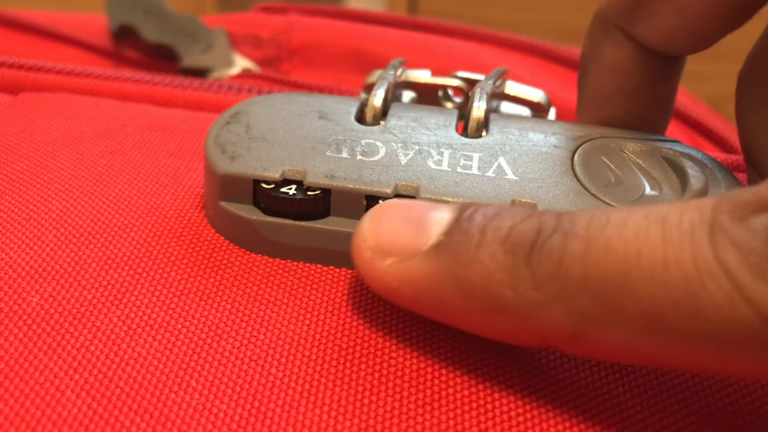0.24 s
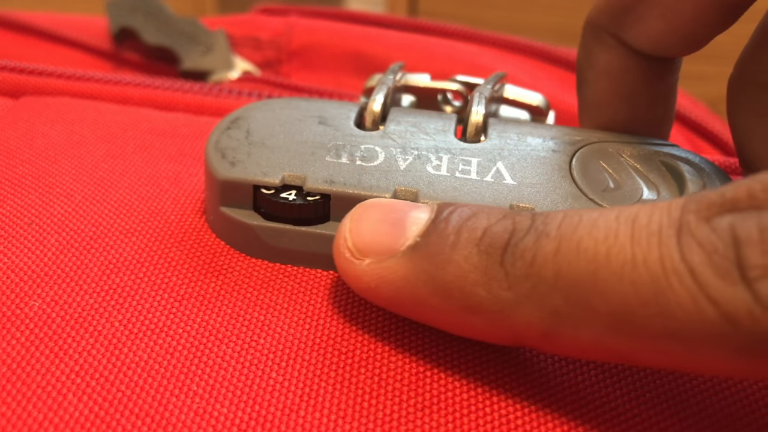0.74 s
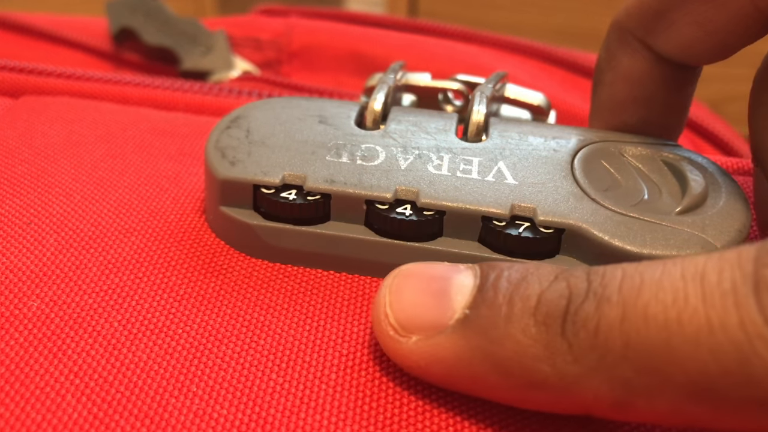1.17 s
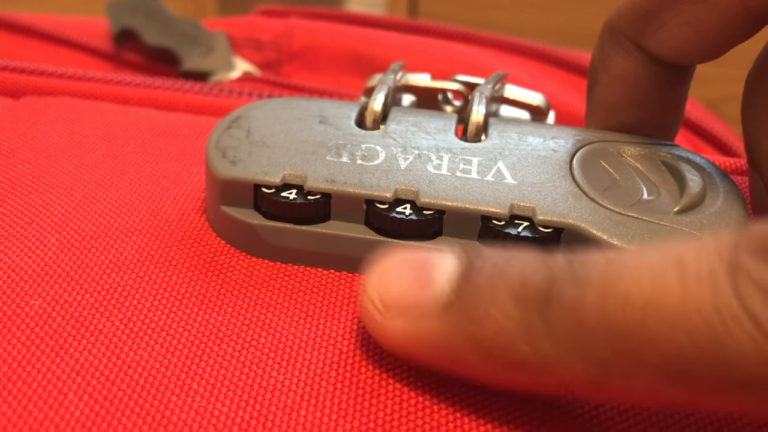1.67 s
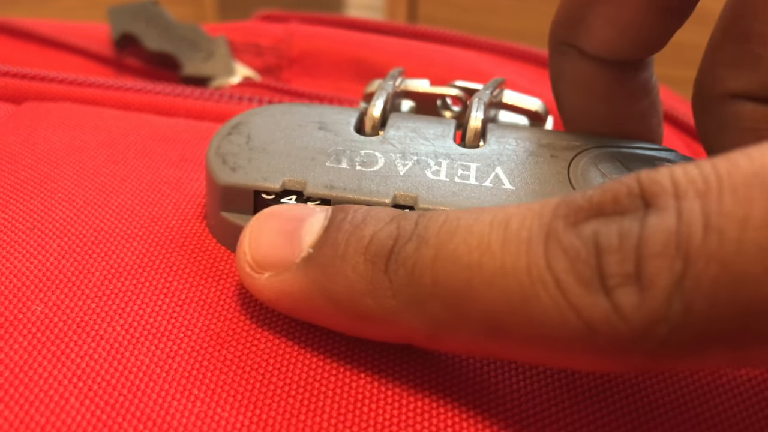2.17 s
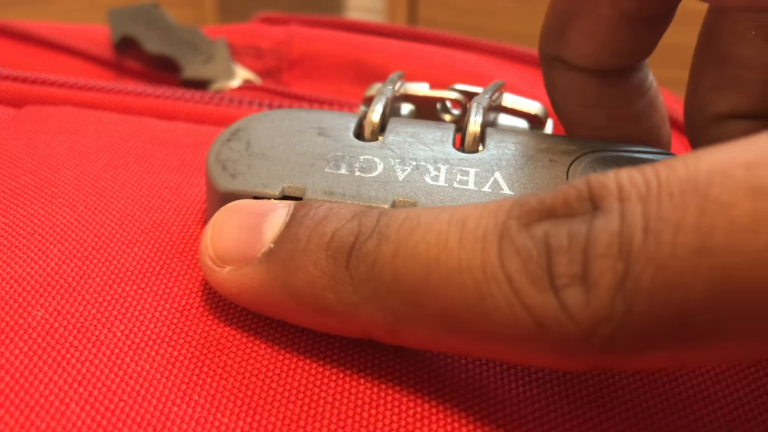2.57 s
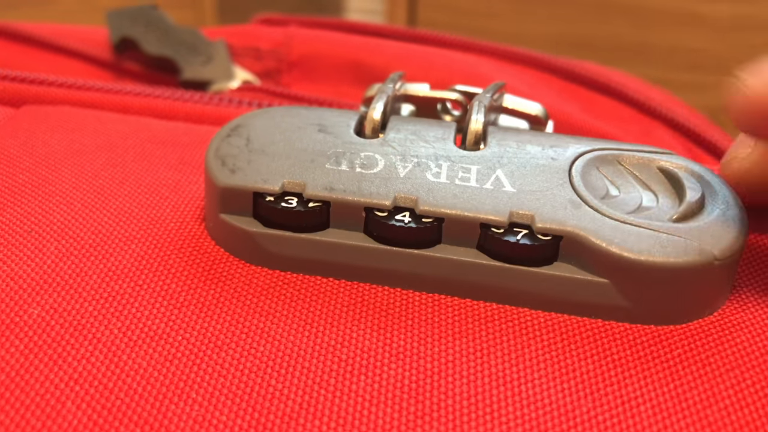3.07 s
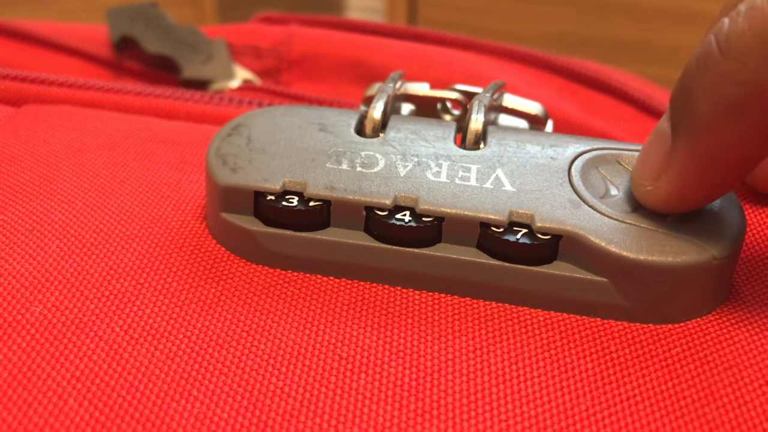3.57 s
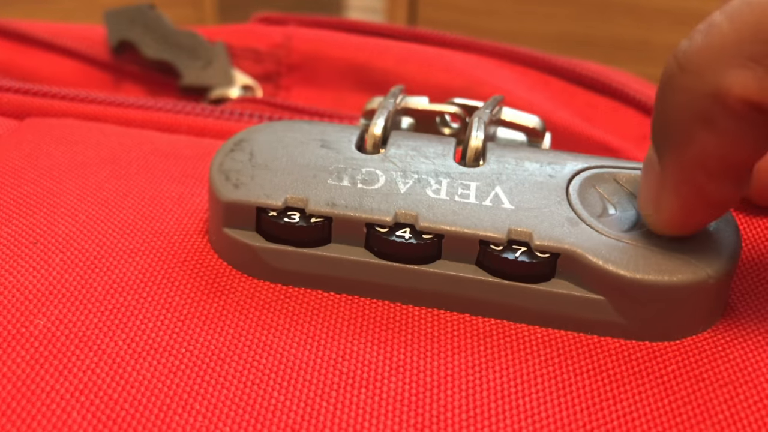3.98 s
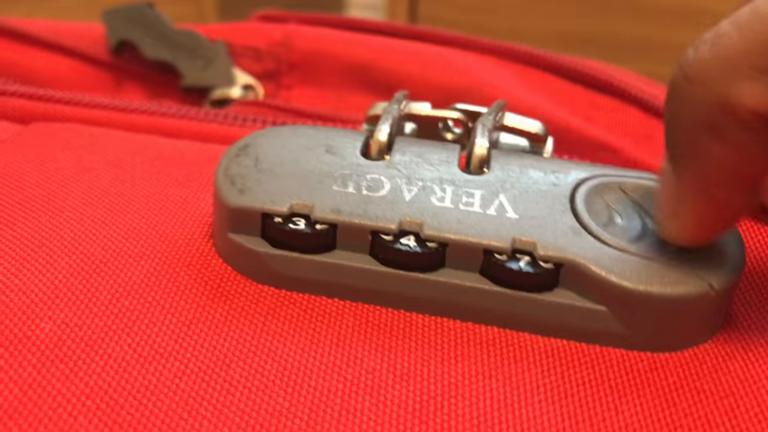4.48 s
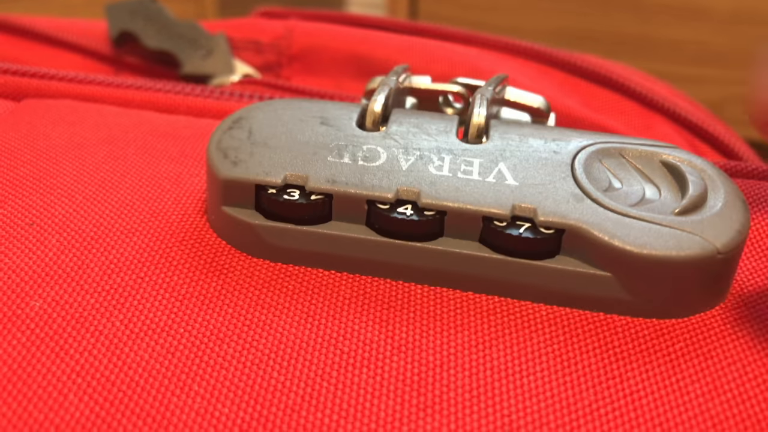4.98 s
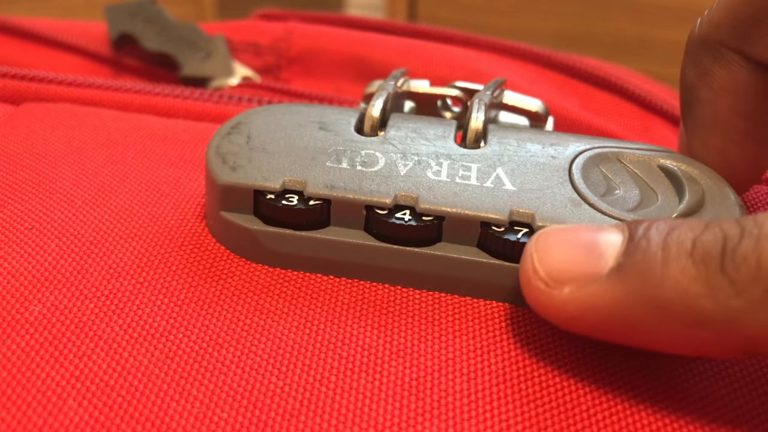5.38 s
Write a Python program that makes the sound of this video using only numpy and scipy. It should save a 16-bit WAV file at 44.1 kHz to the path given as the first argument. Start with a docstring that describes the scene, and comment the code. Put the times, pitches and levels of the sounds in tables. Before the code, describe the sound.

Close, dry plastic clicks and soft skin scuffs on a suitcase lock, building through gritty button creaks to one sharp, thudding snap.

```python
"""A plastic lock on a fabric suitcase clicks close to the microphone: its number wheels tick under a finger,
its button creaks in short slips, and the latch lets go with one loud snap that thuds through the case.
Gritty bursts of force ring the lock, and a smooth push rings the case; a noisy tail follows.
Skin rubs and some wheel clicks hiss as shaped, uneven noise; finger pushes and the snap swing the case low.
A quiet room lies underneath: coloured noise and a wavering hum."""
import sys
import numpy as np
from scipy import signal
from scipy.fft import rfft, irfft
from scipy.io import wavfile
from scipy.ndimage import uniform_filter1d

SR = 44100
rng = np.random.default_rng(int(sys.argv[2]) if len(sys.argv) > 2 else 0)


def transcribe(signal):
    """Save signal, clipped to [-1, 1], as a 16-bit WAV file at the path in sys.argv[1]."""
    frames = np.atleast_2d(signal).T
    limited = np.clip(frames, -1, 1)
    pcm = np.round(limited * 32767).astype(np.int16)
    wavfile.write(sys.argv[1], SR, pcm)


N = 248715  # length in samples


def gain_of(db):
    """Turns decibels into amplitude."""
    return 10 ** (np.asarray(db) / 20)


def evened(x):
    """Scales a signal to an average strength (rms) of one."""
    return x / np.sqrt(np.mean(x ** 2) + 1e-20)


def read_curve(points, hz):
    """Reads a value between the points of a curve, along a logarithmic pitch axis."""
    point_hz, value = np.transpose(points)
    return np.interp(np.log(hz + 1), np.log(point_hz + 1), value)


def add(mix, start_s, sound):
    """Mixes a sound in at its start time."""
    part = mix[round(start_s * SR):][:len(sound)]
    part += sound[:len(part)]


def coloured(x, spectrum):
    """Filters x by a curve of levels over pitch, then evens it."""
    hz = np.fft.rfftfreq(len(x), 1 / SR)
    shaped = rfft(x) * gain_of(read_curve(spectrum, hz))
    return evened(irfft(shaped, len(x)))


def hump(x, hz, width_hz):
    """Keeps a broad band around one pitch, like a heavily damped resonance, and evens it."""
    b, a = signal.iirpeak(hz, hz / width_hz, fs=SR)
    return evened(signal.lfilter(b, a, x))


def bump(seconds):
    """A smooth rise and fall of about that length."""
    u = np.arange(200) / SR / seconds
    return (u * np.exp(-2 * u)) ** 2


def ring(modes, force):
    """A force pulse sets off dying swings; only the change of motion radiates; the peak is one."""
    t = np.arange(SR // 5) / SR
    response = sum(gain_of(db - 60 * t / t60) * np.sin(2 * np.pi * hz * t) for hz, db, t60 in modes)
    motion = signal.fftconvolve(response, force)[:len(t)]
    sound = np.gradient(motion)
    return sound / abs(sound).max()


# Colour of the hiss and rumble. Each row: pitch in Hz, relative level in dB.
QUIET_SPECTRUM = [(12, -57), (20, -25), (34, -6), (58, -4), (70, -2.5), (88, -25), (104, -12.5), (123, -8),
                  (163, -20), (234, -22), (410, -27.5), (897, -31), (1220, -33), (1400, -35), (16000, -45)]
QUIET_DB = -68  # rms level of the hiss and rumble
# The hum. One row: pitch in Hz, wavering of the level in dB rms, middle level in dB rms.
ROOM_HUM = (120, 1.5, -76.5)


def quiet_room():
    """Coloured noise gives hiss and rumble; a sine hums, its level and phase wavering slowly together."""
    hz, waver_db, db = ROOM_HUM
    waver = rng.standard_normal(N)
    for _ in range(2):
        waver = uniform_filter1d(waver, size=3000)
    waver = evened(waver)
    phase = 2 * np.pi * hz * np.arange(N) / SR + .8 * waver
    hum = np.sqrt(2) * gain_of(db + waver_db * waver) * np.sin(phase)
    hiss_and_rumble = gain_of(QUIET_DB) * coloured(rng.standard_normal(N), QUIET_SPECTRUM)
    return hiss_and_rumble + hum


# How fast the room's tail dies. Each row: pitch in Hz, time to fall by 60 dB in seconds.
ROOM_DECAY = [(200, 0.022), (1000, 0.2), (3000, 0.2), (8000, .15), (15000, .1)]
ROOM_DB = -13.5  # gain of the tail when it is mixed in


def room_tail(x):
    """Sound energy, blurred in pitch, is stored and drains away band by band as noise."""
    hz, t, bands = signal.stft(x, SR, nperseg=256, noverlap=192)
    power = uniform_filter1d(abs(bands) ** 2, size=5, axis=0)
    # share of the energy left after one time step; 120 because energy is amplitude squared
    keep = gain_of(-120 * (t[1] - t[0]) / np.maximum(read_curve(ROOM_DECAY, hz), .01))
    stored = np.array([signal.lfilter([0, 0, 1 - k], [1, -k], p) for k, p in zip(keep, power)])
    real, imaginary = rng.standard_normal((len(t), len(hz), 2)).T
    noise = np.sqrt(abs(stored)) * (real + 1j * imaginary)
    return signal.istft(noise, SR, nperseg=256, noverlap=192)[1][:N]


# Low swings of the case, set off by soft finger pushes and by the latch's snap (the two rows near
# 4.59 s). Each row: start in seconds, peak in dB before the microphone, pitch in Hz, time to fall
# by 60 dB in seconds.
CASE_SWINGS = [(1.089, -54.5, 59.5, 0.08), (1.896, -50.5, 76, 0.06), (2.305, -42, 84, 0.084),
               (2.404, -48, 102, 0.091), (2.745, -50, 59, 0.096), (4.584, -28.5, 76, 0.11),
               (4.591, -21.5, 114.5, 0.061), (5.148, -45, 55, 0.079)]


def case_swings(rise_s=0.0034):
    """A smooth pulse of force, from the finger or the snap, gives the case one low, dying swing."""
    out, t = np.zeros(N), np.arange(SR // 40) / SR
    force = (t * np.exp(-t / rise_s)) ** 2  # strongest after rise_s seconds
    for start_s, db, hz, t60 in CASE_SWINGS:
        add(out, start_s, gain_of(db) * ring([(hz, 0, t60)], force))
    return out


def judder(per_s=95, uneven=0.44, sharp=4.0):
    """Sticking and letting go at uneven intervals: a train of short bursts between zero and one."""
    drift = evened(uniform_filter1d(rng.standard_normal(N), size=500))
    rate = per_s * np.exp(uneven * drift)
    return np.exp(-sharp * (np.cumsum(rate) / SR % 1))


# Colour of the rubbing hiss. Each row: pitch in Hz, relative level in dB.
SKIN_SPECTRUM = [(1290, -48), (2200, -6.5), (2640, -6.5), (3300, -2), (3650, -3), (4100, 0), (4840, -6.5),
                 (6260, 1), (7090, -3.5), (7710, -5), (10300, -9), (12700, -3), (16000, -8)]
# Strokes of skin over plastic and cloth, and short noisy bursts of the wheel clicks near 2.3 and 2.4 s.
# Each row: start of full pressure or strength in seconds, rise, hold and fall in seconds, level of hiss
# with whistle in dB, then fine fizz, low scrape and drag on the case in dB relative to that,
# whistle in dB relative to the hiss, whistle pitch in Hz, half the judder depth in dB.
RUBS_AND_BURSTS = [(0.042, 0.17, 0.19, .02, -75, 5, -9.5, -18, -6, 4840, 7.1),
                   (0.700, 0.055, 0.013, .015, -76.5, -7, -6, -13, -15, 6400, 9.1),
                   (0.91, 0.04, 0.073, .03, -81.5, 1.5, -13, 0, -6, 6450, 6),
                   (1.098, 0.038, 0.025, 0.074, -60, 0.5, -6.5, -8, -7, 6200, 2.5),
                   (1.72, 0.037, 0.015, 0.013, -77.5, 7.5, -0.5, 4, -15, 6400, 3.3),
                   (1.838, 0.073, .15, 0.054, -63, -2.3, -7, -4, -6.5, 6800, 2.5),
                   (2.222, 0.0088, 0.014, 0.036, -71.5, 2.5, -8, -5, -10, 6000, 6),
                   (2.3, 0.0075, 0.0026, 0.0078, -52, -13, -1, 6, -8, 5900, 2.1),
                   (2.404, 0.0042, 0.0036, 0.028, -56.5, -14, -7, -17, -10, 5800, 5.3),
                   (2.53, 0.045, 0.048, 0.049, -76.5, 2, 0.5, -2.5, -24, 5760, 4),
                   (2.755, 0.037, 0.076, 0.06, -59, -1, -4.5, -6, -13, 6840, 1.7),
                   (2.877, 0.046, 0.0047, 0.013, -71, -6, 3, 6, -19, 6740, 2.6),
                   (2.944, 0.045, 0.056, 0.088, -63, -5, -7.5, -3.5, -2, 5180, 0.54),
                   (3.19, 0.11, 0.12, 0.1, -68, -0.5, -5.5, 0, -11, 4570, 1),
                   (3.368, 0.036, .015, 0.042, -58.5, -16.5, -8.5, -3, -36, 5970, 1.7),
                   (3.465, 0.017, 0.0057, 0.017, -81, -2, 5.5, 10, -15, 4330, 2.5),
                   (4.63, .02, 0.024, 0.083, -55.5, -7, -5, 2.2, -17, 3420, 2.5),
                   (4.802, 0.1, .19, .05, -72, -1.5, -3, -1, -19.5, 3420, 1.5),
                   (4.927, 0.013, 0.0076, 0.023, -56, -19.5, -15, -23, -4, 3420, 2.5),
                   (5.139, 0.032, .012, 0.035, -67, -7, -4.5, -0.5, -5, 6000, 4.8),
                   (5.25, 0.13, 0.074, .06, -78.5, -1, -9, 2, -13, 3544, 5.5),
                   (5.36, 0.037, 0.066, 0.036, -77, -1.5, -2.5, -5, -19, 3470, 4),
                   (5.465, 0.021, 0.0089, 0.028, -75.5, -13.5, -0.8, -23, -8, 3550, 5.5)]
RUB_RANGE_DB = 20  # the level climbs this much in the rise time and drops it in the fall time


def rubs_and_bursts(grain_db=1.52, flutter_db=2.0, split_hz=8000, whistle_width_hz=1300):
    """Dense uneven grains, as of catching skin ridges or a wheel's click, hiss, scrape and drag."""
    flutter = evened(uniform_filter1d(rng.standard_normal(N), size=260))
    grain_level_db = grain_db * rng.exponential(1, N) + flutter_db * flutter
    grains = rng.standard_normal(N) * gain_of(grain_level_db)
    skin = coloured(grains, SKIN_SPECTRUM)
    hiss = signal.sosfiltfilt(signal.butter(2, split_hz, fs=SR, output="sos"), skin)
    fizz = evened(skin - hiss)
    scrape = hump(hump(grains, 1200, 990), 1200, 990)
    drag = hump(hump(grains, 200, 280), 200, 280)
    out, catches = np.zeros(N), judder()
    for (full_s, rise, hold, fall, db, fizz_db, scrape_db, drag_db,
         whistle_db, hz, judder_db) in RUBS_AND_BURSTS:
        first = max(round((full_s - 2 * rise) * SR), 0)
        last = min(round((full_s + hold + 2 * fall) * SR), N)
        at = np.arange(first, last)
        t = at / SR - full_s
        distance = np.maximum(-t, 0) / rise + np.maximum(t - hold, 0) / fall
        level_db = db - RUB_RANGE_DB * distance
        whistle = hump(hump(grains[at], hz, whistle_width_hz), hz, whistle_width_hz)
        layers = evened(evened(hiss[at]) + gain_of(whistle_db) * whistle)
        layers += gain_of(fizz_db) * fizz[at]
        layers += gain_of(scrape_db) * scrape[at]
        layers += gain_of(drag_db) * drag[at]
        stick_slip = evened(gain_of(2 * judder_db * catches[at]))
        out[at] += gain_of(level_db) * stick_slip * layers
    return out


# All peaks of the lock below are in dB before the bass cut of the shell.
# Wheels and lock shell tick under the finger. Each row: start in seconds, knock peak in dB, snap in dB
# relative to the knock, thud in dB relative to the knock, slip time in seconds.
WHEEL_SLIPS = [(0.482, -57, -25, -17, 0.0024), (0.708, -66, 2, -11, .001), (0.774, -74.5, 16, -13, 0.0015),
               (1.047, -74, 19.5, -15, 0.00092), (1.086, -67, 10, -13, 0.0041),
               (2.299, -59.5, 8, -11, 0.0021), (2.301, -48.5, 3, 7, 0.0039), (2.4, -48.5, -3, -6, 0.0042),
               (2.415, -51, -9, -12, 0.0021), (2.589, -67, 14, -30, 0.00021),
               (2.662, -76.5, 17, -20, 0.00055), (2.736, -61, -9, 7, 0.0046), (2.829, -45, 4, -32, 0.00025),
               (3.074, -63.5, -8, 10, .002), (3.812, -78, 12, -15, .0015), (3.826, -75, 15, -13, .0015),
               (4.924, -68, 9, -24, .005), (5.044, -70.5, 15.5, -18, 0.00092),
               (5.112, -84.5, 7, -16, 0.00089), (5.138, -59.5, -3, -5.5, 0.0029),
               (5.279, -76, 8, -15, .001)]
WHEEL_HZ, WHEEL_TICK_DB = 1460, -12  # knock pitch; tick relative to the snap
# The button creaks in slips. Each row: start in seconds, knock peak in dB, then tick, snap and thud
# in dB relative to the knock, knock pitch in Hz.
BUTTON_SLIPS = [(3.841, -36, -4, -3.5, -15.5, 1090), (3.8619, -26.5, -4, -6.5, -26, 1400),
                (3.873, -40, 7.5, 2.5, -2.5, 1650), (3.976, -30, -12.5, -18.5, -11, 954),
                (4.001, -51.5, -21, -12, 2, 960), (4.015, -42, -10, -21, -3.5, 1075),
                (4.097, -38, -7.5, -16, -4.5, 1130), (4.108, -39.5, -21, -15, -15, 1092),
                (4.115, -24, -6, -18.5, -13, 940), (4.211, -57.5, -23, -18, 6, 1230),
                (4.229, -47, -18, -27, 0, 650), (4.238, -41, -14.5, -15.5, 1, 655),
                (4.250, -48, -28, -16, 2, 1170), (4.317, -41.5, -11, -17.5, -2.5, 1230),
                (4.328, -47, -31, -24, -13, 1210), (4.335, -24.5, -4, -14, -11.5, 1034),
                (4.432, -48, -27, -25, -2, 600), (4.44, -49.5, -15, -21, 6, 600),
                (4.446, -52.5, -7, -7.5, 2, 790), (4.452, -38.5, -31.5, -21, -7.5, 1220),
                (4.517, -39, -28, -25, -9, 1026), (4.526, -42, 0, -23, -15, 1010),
                (4.530, -21, -2, -11, -17, 980), (4.553, -48.5, -3, -12, 5, 1550),
                (4.559, -60, 9, 3, 7, 1520)]
# Harder slips are quicker: time in seconds at the reference level in dB, dB of time lost per dB of level.
BUTTON_SLIP_S, BUTTON_SLIP_AT_DB, QUICKENING = .0014, -33.5, 0.34
# The latch lets go in four blows. Each row: start in seconds, knock peak in dB, then tick, snap and thud
# in dB relative to the knock, knock pitch in Hz, slip time in seconds.
LATCH_RELEASE = [(4.5763, -14.5, -3, -1.5, -18, 1860, 0.0033), (4.5785, -13.5, 6.5, -3, -10, 1134, 0.0011),
                 (4.5828, -21.5, 17.5, 4, 15.5, 1000, 0.0005), (4.586, -18.5, -2.5, 8, -8.5, 1850, 0.0006)]


def slips():
    """Lists every click of latch, button and wheels, in rows laid out like the latch table."""
    wheels = [(start_s, db, snap_db + WHEEL_TICK_DB, snap_db, thud_db, WHEEL_HZ, slip_s)
              for start_s, db, snap_db, thud_db, slip_s in WHEEL_SLIPS]
    button = [(start_s, db, tick_db, snap_db, thud_db, hz,
               BUTTON_SLIP_S * gain_of(QUICKENING * (BUTTON_SLIP_AT_DB - db)))
              for start_s, db, tick_db, snap_db, thud_db, hz in BUTTON_SLIPS]
    return list(LATCH_RELEASE) + button + wheels


# Swings of the knock. Each row: multiple of the knock pitch, relative swing in dB,
# time to fall by 60 dB in seconds.
KNOCK_MODES = [(0.599, -15, 0.0051), (0.998, 2, 0.0091), (1.45, 2, .008), (2, -7, 0.0059)]
# Swings of the tick, the snap and the thud of the case. Each row: pitch in Hz, relative swing in dB,
# time to fall by 60 dB in seconds.
TICK_MODES = [(2350, -4.5, 0.0015), (2830, -18.5, 0.033), (3200, -0.5, 0.0021), (3660, -0.5, 0.0029),
              (5000, -11, 0.00099)]
SNAP_MODES = [(6030, 0.5, .004), (6420, -10.5, 0.019), (7080, 3, 0.0033), (8320, -6, 0.005),
              (9800, -13.5, 0.0016), (11200, -14.5, 0.0027), (13200, -13.5, 0.0053)]
THUD_MODES = [(90, -1, 0.087), (142, -4.5, 0.092), (214, 1, 0.042), (305, -7, 0.045), (402, -14.5, 0.07)]
SHELL_LOW_HZ, THUD_LAG_S = 380, .0015  # the small shell radiates no bass; the case answers a little later


def clicks(fade=1.8, soft=0.58, tick_soft_s=0.00019):
    """Every slip knocks, ticks and snaps in the plastic shell and thuds into the case."""
    out, t, rows = np.zeros(N), np.arange(SR // 40) / SR, slips()
    grit = rng.standard_normal((len(rows), len(t)))
    bass_cut = signal.butter(2, SHELL_LOW_HZ, "high", fs=SR, output="sos")
    push = np.hanning(SR // 400)  # a smooth force of 2.5 ms
    for (start_s, db, tick_db, snap_db, thud_db, hz, slip_s), noise in zip(rows, grit):
        # the slip is a gritty burst of force, not one clean blow
        slip = noise * (t / slip_s) * np.exp(-fade * t / slip_s)
        # slower swings feel the force smoothed over part of their cycle
        knock_modes = [(hz * k, k_db, t60) for k, k_db, t60 in KNOCK_MODES]
        knock = ring(knock_modes, np.convolve(slip, bump(soft / hz)))
        tick = ring(TICK_MODES, np.convolve(slip, bump(tick_soft_s)))
        snap = ring(SNAP_MODES, slip)
        shell = knock + gain_of(tick_db) * tick + gain_of(snap_db) * snap
        add(out, start_s, gain_of(db) * signal.sosfilt(bass_cut, shell))
        add(out, start_s + THUD_LAG_S, gain_of(db + thud_db) * ring(THUD_MODES, push))
    return out


def scene():
    """Mixes room, case, rubbing and lock; only the clicks of the lock's shell and thuds get the tail."""
    lock = clicks()
    tail = gain_of(ROOM_DB) * room_tail(lock)
    return (quiet_room() + tail + case_swings() + rubs_and_bursts() + lock)[None]


MIC_LOW_HZ, EDGE_HZ = 40, 15950  # lower and upper limits of the sound


def record(dry):
    """The microphone loses the deepest bass; then a filter removes the highest treble."""
    x = signal.sosfilt(signal.butter(4, MIC_LOW_HZ, "high", fs=SR, output="sos"), dry)
    treble_cut = signal.firwin(511, EDGE_HZ, window=("kaiser", 9), fs=SR)
    return signal.oaconvolve(x, treble_cut[None], "same")


dry = scene()
out = record(dry)
transcribe(out)
```